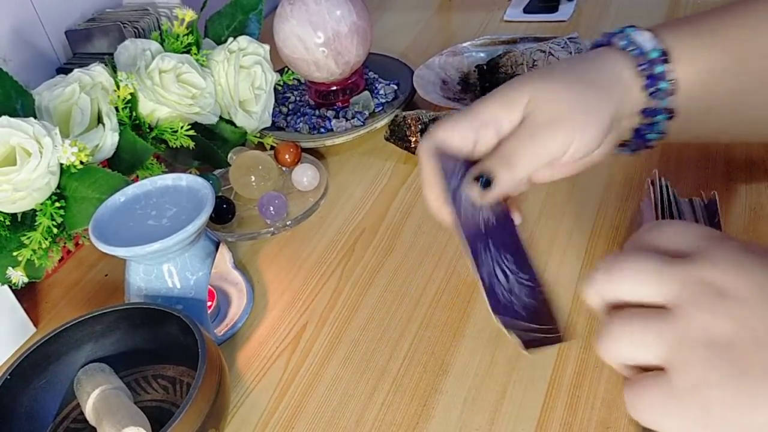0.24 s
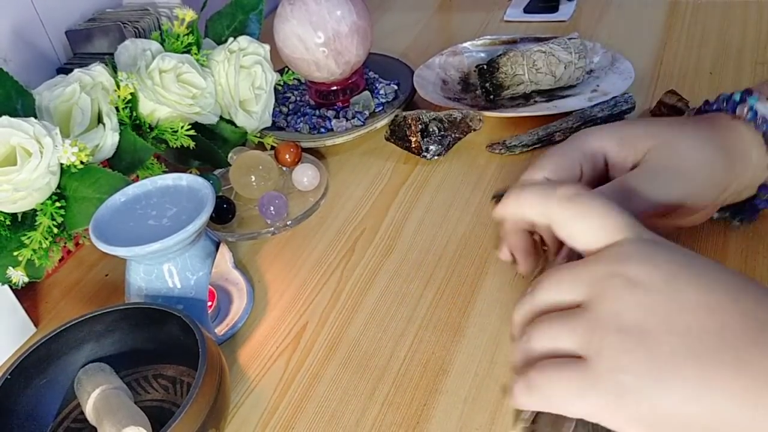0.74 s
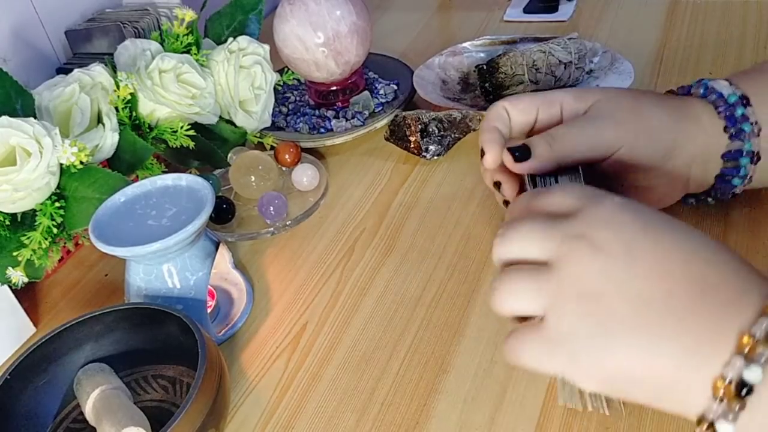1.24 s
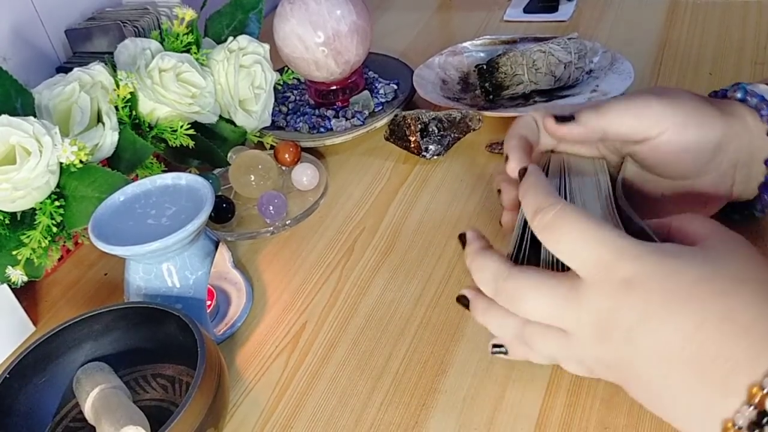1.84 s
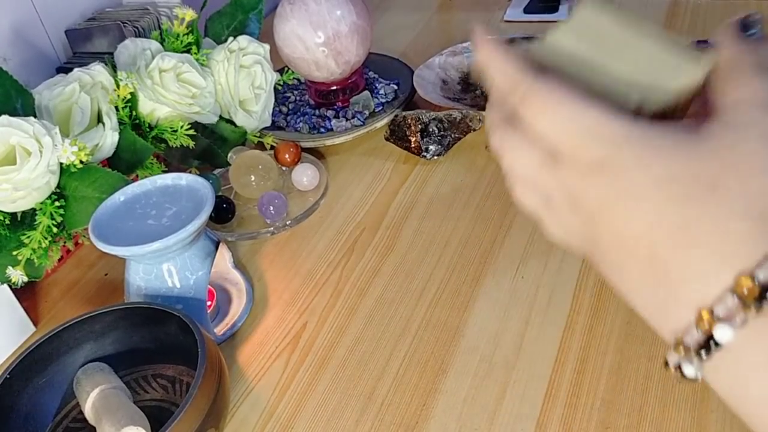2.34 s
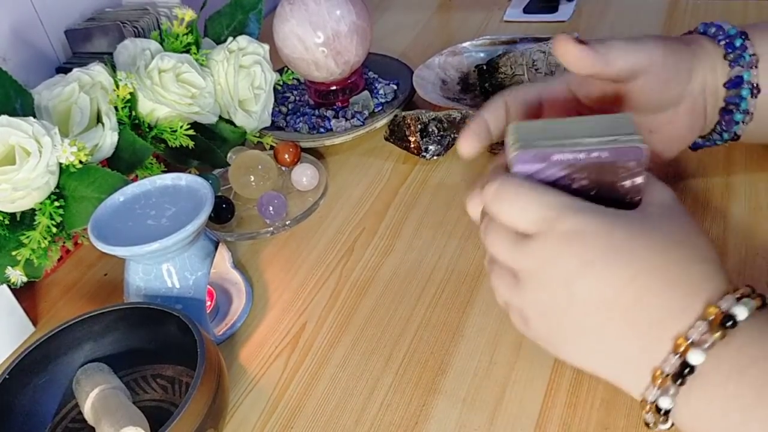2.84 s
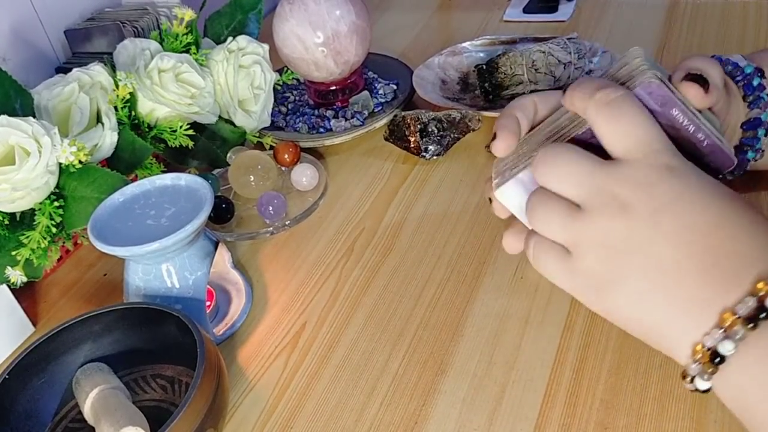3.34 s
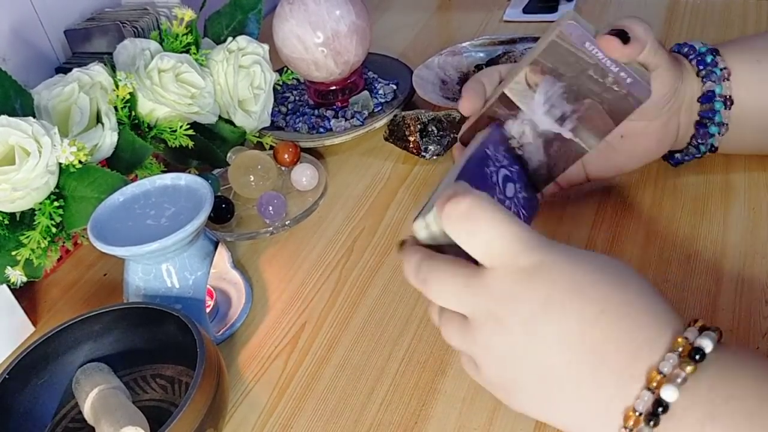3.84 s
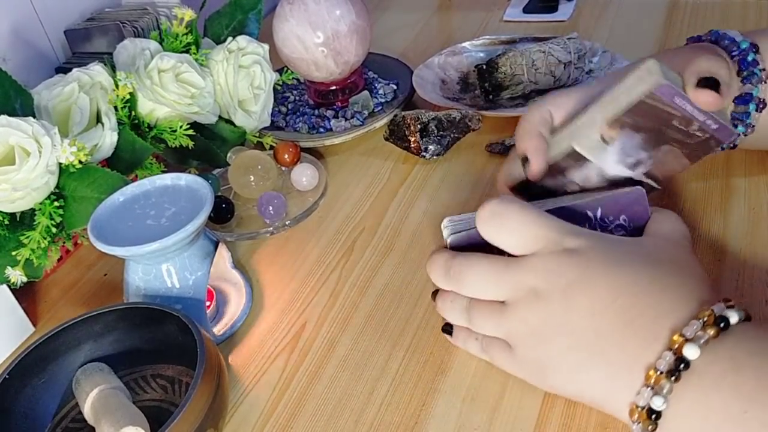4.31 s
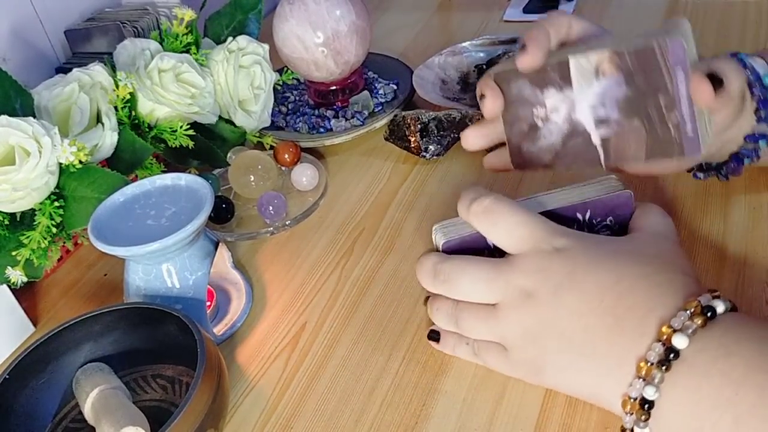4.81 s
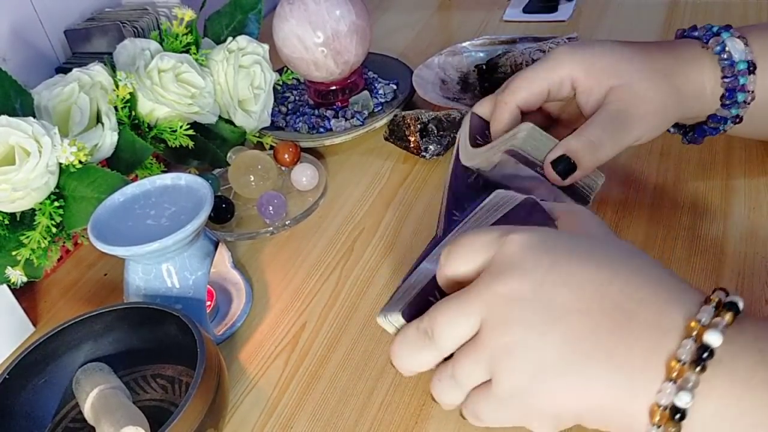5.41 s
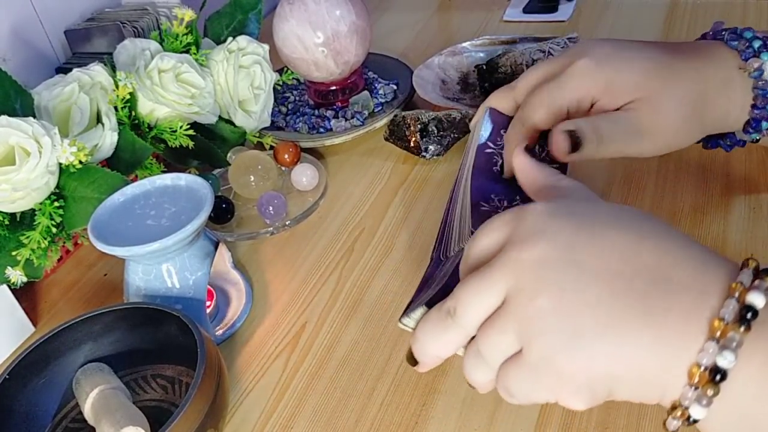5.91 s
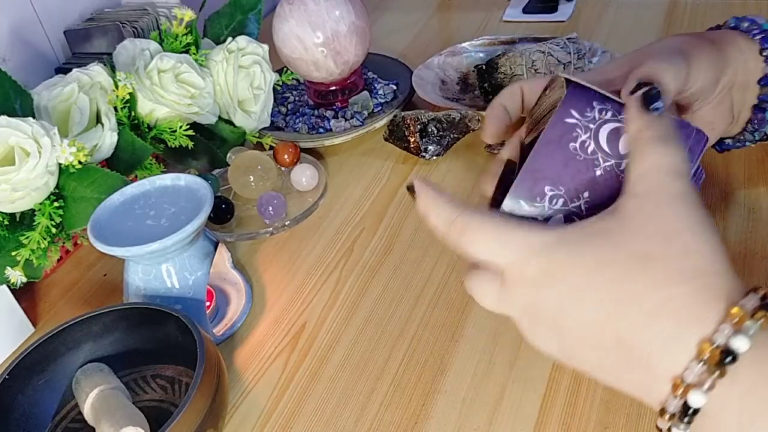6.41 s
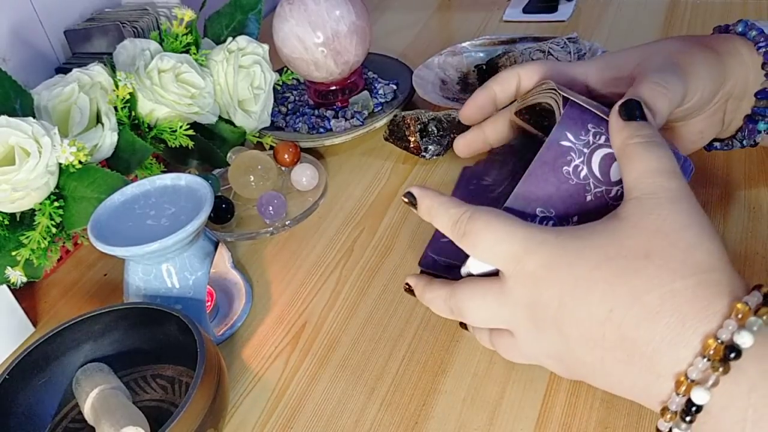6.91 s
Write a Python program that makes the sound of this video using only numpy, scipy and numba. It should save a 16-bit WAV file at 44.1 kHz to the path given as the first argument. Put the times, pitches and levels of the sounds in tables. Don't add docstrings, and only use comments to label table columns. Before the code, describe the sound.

Sparse card taps and scrapes on wood lead to a short, loud purring riffle, then quieter flicking edges, over nearly silent background hum.

```python
import sys
import numpy as np
from scipy import signal
from scipy.fft import rfft, irfft
from scipy.io import wavfile
from scipy.ndimage import uniform_filter1d
from numba import njit

SR = 44100
rng = np.random.default_rng(int(sys.argv[2]) if len(sys.argv) > 2 else 0)


def wrap_up_sound(samples):
    columns = np.atleast_2d(samples).T
    tamed = np.clip(columns, -1, 1)
    steps = np.round(tamed * 32767).astype(np.int16)
    wavfile.write(sys.argv[1], SR, steps)


def linear_from_db(decibels):
    return 10 ** (np.asarray(decibels, float) / 20)


N = 315664


def unit(x):
    return x / np.sqrt(np.mean(x ** 2))


def coloured(x, points):
    hz, db = np.transpose(points)
    f = np.maximum(np.fft.rfftfreq(len(x), 1 / SR), 1)
    gain_db = np.interp(np.log(f), np.log(hz), db, left=-80, right=-80)
    return irfft(rfft(x) * linear_from_db(gain_db), len(x))


@njit
def svf(x, hz, width):
    y, band, low = np.empty(len(x)), 0., 0.
    g, k = np.tan(np.pi * hz / SR), width / hz
    for i in range(len(x)):
        v = (band + g * (x[i] - low)) / (1 + g * (g + k))
        band = 2 * v - band
        low = low + 2 * g * v
        y[i] = k * v
    return y


def walk(rate_hz):
    hold = max(int(SR / rate_hz), 1)
    steps = np.repeat(rng.standard_normal(N // hold + 1), hold)
    return unit(uniform_filter1d(uniform_filter1d(steps, hold), hold)[:N])


def mode_ring(push, modes):
    out = 0
    for hz, width_hz, db in modes:
        once = svf(push, 1. * hz, 1. * width_hz)
        out = out + linear_from_db(db) * svf(once, 1. * hz, 2. * width_hz)
    return unit(out)


# frequency in Hz, density in dB per Hz.
HISS = [(30, -43), (55, -18), (90, -17.5), (200, -11.5), (400, -14.5), (750, -18.5), (1000, -24.5),
        (2500, -30), (7200, -35.5), (8400, -45)]


def air(open_db):
    noise = coloured(rng.standard_normal(N), HISS)
    high = coloured(noise, [(20, -54.5), (700, -35.5), (1000, 0), (9000, 7.0)])
    rumble = unit(noise - high) * linear_from_db(1.5 + 0.16 * walk(5.8))
    hiss = unit(high) * linear_from_db(.5 * walk(30))
    return linear_from_db(open_db) * (hiss + rumble)


# multiple of mains frequency, level in dB.
HUM = [(2, -3), (3, -16.5), (4, -10), (6, 1.5), (8, -26), (10, -24.5), (12, -11)]


def hum(open_db):
    mains_hz, hum_db, ceiling_db = 60.11, -0.17, -66.5
    t, out = np.arange(N) / SR, 0
    for k, db in HUM:
        level = linear_from_db(db + 4 / np.sqrt(k) * walk(25))
        out = out + level * np.sin(2 * np.pi * k * mains_hz * t + .2 * walk(4.2))
    return np.sqrt(2) * out * linear_from_db(np.minimum(open_db + hum_db, ceiling_db))


# time in seconds, hiss level in dB.
ROOM = [(0.0, -70), (1.67, -66), (1.83, -52), (1.99, -69), (2.15, -58), (2.29, -72.5), (2.8, -71),
        (3.07, -66), (3.39, -69), (4.01, -67.5), (4.09, -63), (4.56, -70), (4.75, -65), (5.4, -73),
        (5.8, -52.5), (6.2, -67.5), (6.5, -69), (7.16, -60.5)]


def room():
    open_db = np.interp(np.arange(N) / SR, *np.transpose(ROOM))
    return air(open_db) + hum(open_db)


def walls(x, shut_s=0.1, wet_db=-.5):
    t60_s, room_db, onset_s = 0.64, -5, 0.0024
    t = np.arange(SR // 2) / SR
    heard = t > onset_s
    fade = np.exp(-np.log(1000) * t / t60_s - (t / shut_s) ** 4) * heard
    tail = rfft(rng.standard_normal(len(t)) * fade)
    smooth = np.sqrt(uniform_filter1d(np.abs(tail) ** 2, size=150))
    tail = irfft(tail / smooth, len(t)) * heard
    return linear_from_db(room_db + wet_db) * signal.fftconvolve(x, tail / np.sqrt(np.sum(tail ** 2)))[:N]


def layer_powers(table, faces, rasp_db, deck_db):
    share = 0.5
    deck = linear_from_db(-5 + deck_db) * table ** (1 - share) * faces ** share
    slap = faces * linear_from_db(-10 - .7 * rasp_db)
    return np.square([table, deck, faces, faces * linear_from_db(rasp_db), slap])


def scrape(since_s, length_s, sag, release):
    rise = np.clip(since_s / .005, 0, 1) ** 2
    fall_db = sag * np.clip(since_s, 0, length_s) + release * np.maximum(since_s - length_s, 0)
    return rise * linear_from_db(-fall_db)


# start in seconds, scrape length in seconds, table in dB,
# faces in dB, rasp re faces in dB.
KNOCKS = [(0.865, 0.037, -60, -65, 1), (0.893, 0.058, -58.5, -60, -4), (1.012, 0.03, -61, -72.5, 4),
          (1.721, .065, -54, -40, 1.2), (1.75, 0.044, -49, -44, -1), (1.785, 0.058, -44, -32, 0),
          (2.036, 0.085, -47, -40, -9.5), (2.218, 0.013, -80, -66.5, .1), (2.819, 0.027, -44, -53, -2),
          (2.825, 0.099, -40.5, -32, -2.5), (4.005, .006, -79, -70, -4.5), (4.051, 0.026, -52, -74, -9),
          (4.073, 0.071, -47.5, -54.5, -13), (4.639, .02, -62, -88, -2), (4.665, 0.034, -49, -62.5, -10),
          (4.71, 0.068, -36, -43, -4.5)]
SAG_DB_PER_S = [42, 96]
RELEASE_DB_PER_S = [222, 312.5]


def knocks():
    faces_late_s, flat_slap = 0.0023, 0.19
    t, power = np.arange(N) / SR, np.zeros((5, N))
    for s, length_s, table_db, faces_db, rasp_db in KNOCKS:
        on = slice(int(s * SR), int(s * SR) + SR // 2)
        since_s = t[on] - s
        table = linear_from_db(table_db) * scrape(since_s, length_s, SAG_DB_PER_S[0], RELEASE_DB_PER_S[0])
        faces = scrape(since_s - faces_late_s, length_s, SAG_DB_PER_S[1], RELEASE_DB_PER_S[1])
        power[:, on] += layer_powers(table, linear_from_db(faces_db) * faces, rasp_db, -flat_slap * rasp_db)
    return power


# time in seconds, pressure in dB, faces re pressure in dB.
RIFFLE_SLIDE = [(5.48, -80, -8), (5.558, -56.5, -8), (5.642, -51, -9.5), (5.714, -45, -4.5),
                (5.76, -38.5, -8), (5.88, -36.5, 2.4), (5.999, -35.5, -2), (6.054, -47.5, -15),
                (6.16, -72.5, -9)]
FAN_SLIDE = [(6.48, -73, -10), (6.538, -76, 5.5), (6.578, -63.5, -4), (6.658, -57, -7.5), (6.764, -68, -5),
             (6.932, -63, -5.5), (7.092, -51, -13.5), (7.158, -49.5, -7.5)]
SLIDE_RASP_DB = [1.5, 5.5]
SLIDE_DECK_DB = [-0.5, 1.5]


def slides():
    t, power = np.arange(N) / SR, np.zeros((5, N))
    for rows, rasp_db, deck_db in zip([RIFFLE_SLIDE, FAN_SLIDE], SLIDE_RASP_DB, SLIDE_DECK_DB):
        s, pressure_db, faces_db = np.transpose(rows)
        fade = np.clip(np.minimum(t - s[0], s[-1] + 0.0083 - t) / 0.012, 0, 1)
        table = fade * linear_from_db(np.interp(t, s, pressure_db))
        faces = table * linear_from_db(np.interp(t, s, faces_db))
        power += layer_powers(table, faces, rasp_db, deck_db)
    return power


# frequency in Hz, density in dB per Hz.
TABLE = [(18, -51), (30, -14), (91, -17), (124, -2.5), (254, -11.5), (350, 3), (436, -14.5), (650, -16.5),
         (840, -37), (1430, -120)]
RUB = [(4000, -31), (4400, 8.5), (4900, 6), (5500, 0), (6300, 1), (7000, -4), (7700, -12.5), (8500, -34.5)]
# centre in Hz, width in Hz, level in dB.
TABLE_MODES = [(281, 59, 0.5), (357, 17, 6), (503, 48, -0.5)]
DECK_MODES = [(764, 240, 7), (1383, 1100, 0.5), (2238, 76, -10), (1011, 370, -3.5), (2170, 1700, -5.5)]
FACE_MODES = [(3480, 750, 3.5), (3890, 340, 5)]
SLAP_MODES = [(640, 200, -2), (860, 200, -1), (2430, 110, 3)]


def packets():
    grit = linear_from_db(1.3 * walk(700) + .3 * walk(90)) * rng.standard_normal((5, N))
    wood = unit(unit(coloured(grit[0], TABLE)) + 0.53 * mode_ring(grit[0], TABLE_MODES))
    deck = mode_ring(grit[1], DECK_MODES)
    faces = mode_ring(grit[2], FACE_MODES)
    rasp = unit(coloured(grit[3], RUB))
    slap = mode_ring(grit[4], SLAP_MODES)
    gains = np.sqrt(knocks() + slides())
    return np.sum(gains * [wood, deck, faces, rasp, slap], axis=0)


SNAP_HZ = [(2498, 3060, 3670), (4385, 4820, 5370), (5900, 6680, 7335)]
SNAP_DB = [-5.5, -2, 2.5, 5, 1, -2.5, -4, 0, -2]


def snaps(rows, rise_s=0.00053, fall_s=0.001, push_s=0.00074, thump_hz=600, thump_db=-2,
          gain_db=-3, edge_db=4, focus=0.037):
    out, t = np.zeros(N + 512), (np.arange(512) - 64) / SR
    chance = rng.standard_normal((len(rows), 28))
    shape = np.where(t < 0, np.exp(-(t / rise_s) ** 2), np.exp(-t / fall_s))
    late = (t - t[0]) / push_s
    push = late * np.exp(1 - late)
    for (s, level_db, bright_db, low_db), c in zip(rows, chance):
        hz = np.ravel(SNAP_HZ) * np.exp(0.05 * c[:9])
        parts = linear_from_db(np.array([-bright_db, edge_db + focus * (level_db + 39), bright_db]))
        partial_db = level_db + gain_db - 0.5 * c[19:] + SNAP_DB
        size = np.repeat(parts / np.linalg.norm(parts), 3) * linear_from_db(partial_db)
        ring = size @ np.sin(2 * np.pi * hz[:, None] * t + 3 * c[9:18, None])
        bump_hz = thump_hz * np.exp(.15 * c[18])
        thump = -np.cos(2 * np.pi * bump_hz * push_s * (late - 1)) * push
        thump = thump - push * thump.sum() / push.sum()
        i = int(s * SR) - 64
        out[i:i + 512] += ring * shape + linear_from_db(level_db + low_db + thump_db) * thump
    return out[:N]


# start in seconds, level in dB, # brightness in dB from
# flex to corner, table thump re level in dB.
TOUCHES = [(0.4672, -54, 1, 6), (0.6755, -44, -7, -14), (0.8596, -42, 11, -17), (0.8629, -47, 0.9, -17),
           (0.9232, -46.5, 5, 0.2), (1.428, -53, -13, -0.8), (1.4317, -55.5, -10, 9), (1.4471, -52, 6, 1.7),
           (1.7211, -32, 2, -28), (1.7278, -31, -4, -23.2), (1.7909, -20, -2, -11), (1.9567, -51.9, 9, 2),
           (2.0462, -35, -3, 7), (2.2264, -46.5, 13.5, -21), (2.8363, -25, -5.0, -1.5),
           (4.0097, -47.5, 14, -8), (4.0124, -51, 8, -1), (4.0788, -42.5, -26, 5), (4.2087, -55, 7, -1),
           (4.3876, -58, 6, -8), (4.3993, -55, 6, -8), (4.6292, -59.0, 6, 1), (4.6746, -57, -8, 23),
           (4.72, -34.5, 8, 15.5)]
MORE_TOUCHES = [(.9, -61, -2.5, -10), (1.946, -52.5, 7, -8), (4.9, -57.5, 4, -6), (5.48, -56, .5, -8),
                (6.185, -60, 4, -8)]


def touches():
    return snaps(TOUCHES + MORE_TOUCHES, fall_s=0.0019, push_s=0.0017, thump_hz=430, thump_db=-6,
                 gain_db=-5.5, edge_db=10.5, focus=0.33)


# start in seconds, level in dB, brightness in dB, thump re level in dB.
BUMPS = [(1.738, -39, 1, -11), (1.803, -24, -7.5, -11), (1.808, -27, -15.5, -9), (2.039, -43, 0, -9),
         (2.823, -53, 3, 19.5), (2.853, -40, -1.5, -6), (2.863, -27, -2.5, -11.3), (4.733, -37, -7, 13),
         (4.748, -43, -9, 13), (5.86, -27, 2, 4.5), (5.8945, -29.5, 12, 5.5)]


def bumps():
    return snaps(BUMPS, fall_s=0.00051, push_s=0.0011, thump_hz=363)


# start in seconds, level in dB, brightness in dB, thump re level in dB.
FANNING = [(6.4051, -64, -3, 10.5), (6.5015, -61, 2.5, -8), (6.5058, -52.4, 4, -10),
           (6.5192, -54.7, 6, -19), (6.5721, -45.5, 0.5, -9), (6.594, -41.0, -5.0, -6),
           (6.6264, -40, 6, -1), (6.6501, -51, -11, -10), (6.6674, -55, 6, -2.8), (6.6858, -48, 20, 2),
           (6.7251, -53, 4, 7), (6.7514, -50, 2, 4.8), (6.7919, -41.5, 0.3, -9), (6.829, -51, 5, 6),
           (6.8641, -53, 5, -4), (6.8955, -45, 2, 2), (6.9226, -42, 0, -15), (6.9466, -40.5, 2, 0),
           (6.9756, -41.5, 0.2, -10.3), (6.9803, -48, -0.2, 8), (7.0107, -51, 3, -7), (7.0266, -47, 4, 8),
           (7.0356, -50, -7, -9), (7.0453, -57, 6, -3), (7.0673, -37, 0, -14), (7.0765, -36, -2.8, 2.5),
           (7.0978, -40.5, 2, -20), (7.1022, -37, -4, 4.5), (7.1388, -34.5, -3.5, 3.5)]


def fanning():
    return snaps(FANNING, fall_s=0.0012, thump_db=-4, edge_db=1.5)


# start in seconds, level in dB,
# brightness in dB, thump re level in dB.
RIFFLE_START = [(5.4649, -55, -3, 4), (5.4676, -58, 1, -3), (5.4985, -45, 1.5, -8),
                (5.5389, -40.5, 3, -17.5), (5.5469, -52, 2, -7), (5.558, -49.5, 3, 3), (5.5696, -46, 5, -5),
                (5.5735, -31, 3, -17), (5.5912, -34, 1.0, -13), (5.6, -33, 4.8, -8),
                (5.6168, -58, 0.5, -10.5), (5.6217, -34, 3, -12), (5.6406, -38.5, 4, -8),
                (5.6432, -36, -1, -13), (5.6525, -28.5, 0, -21), (5.6563, -43, -13, -11),
                (5.6742, -31.5, -2, 4), (5.6792, -24, 4, -10), (5.6928, -38.5, 2, -15.5),
                (5.707, -21.5, -2.5, -0.5), (5.7382, -18, 8, -27)]
RIFFLE = [(5.76, -14.0, 1.5, -6.5), (5.764, -15.5, -0.5, -8), (5.7765, -16, -1, -10.5),
          (5.7902, -19, 0, -21.5), (5.7992, -12, 1.5, -10.5), (5.8195, -10.5, -2, -12.5),
          (5.8388, -13, 5.5, -16), (5.8412, -17, 2, -8.5), (5.8567, -20.5, -2.8, -6),
          (5.8645, -21, 2.2, -15), (5.8707, -21.0, -6.3, -16), (5.8742, -15.5, -2, -13),
          (5.8773, -14.5, 1.8, -2), (5.904, -10.5, 4.5, -22.5), (5.9081, -17, 0, -3),
          (5.9135, -12, -1, -16.5), (5.9207, -28.5, -3, -15), (5.927, -14.5, 0.5, 0),
          (5.9375, -20.5, -0.5, -14), (5.9472, -11, 0.5, -8), (5.956, -23.5, 5, -16),
          (5.9631, -11, 2, -17.5), (5.9675, -23.5, -5, -5.5), (5.9808, -16.5, 6, -7.5),
          (5.9865, -21, -6, -7), (5.9939, -26.5, -2.9, -19), (6.0052, -21.5, 1.5, -19),
          (6.0113, -29, -6.5, -9.5)]


def riffle():
    return snaps(RIFFLE_START + RIFFLE, edge_db=-1.5)


def scene():
    run = riffle()
    cards = fanning() + touches() + bumps()
    echo = walls(run, shut_s=0.071, wet_db=-1.5) + walls(cards, wet_db=-0.5)
    return (room() + packets() + echo + cards + run)[None]


def low_pass(x):
    return signal.sosfilt(signal.butter(12, 8520, fs=SR, output="sos"), x)


def record(dry):
    top_hz, bottom_hz = 7590, 60
    band = signal.sosfilt(signal.cheby1(6, 1, top_hz, fs=SR, output="sos"), dry)
    band = signal.sosfilt(signal.butter(3, bottom_hz, "high", fs=SR, output="sos"), band)
    return low_pass(band)


dry = scene()
out = record(dry)
wrap_up_sound(out)
```